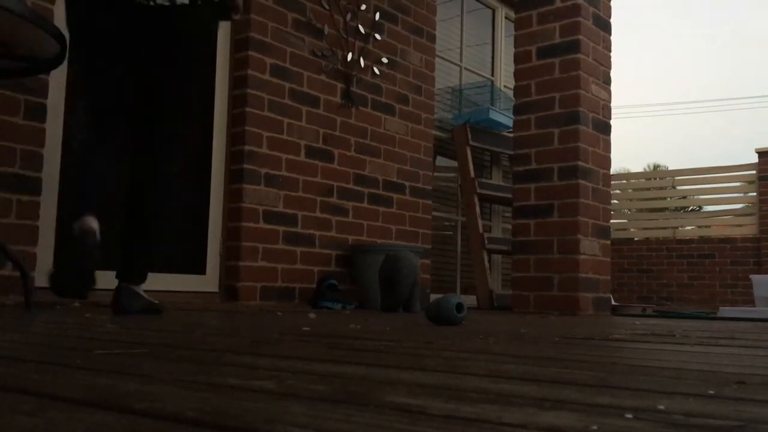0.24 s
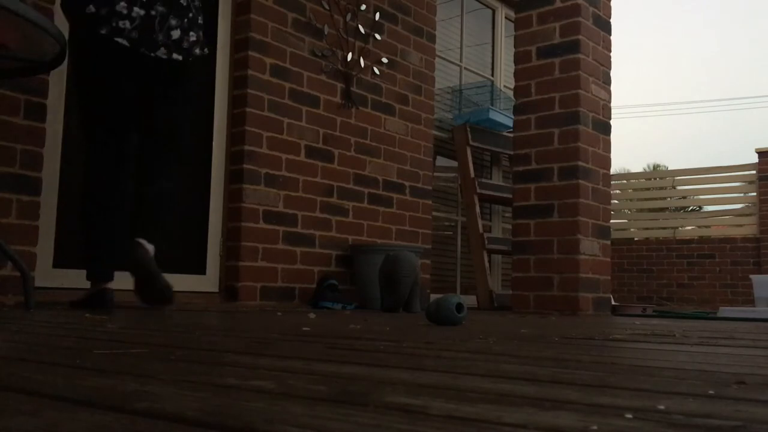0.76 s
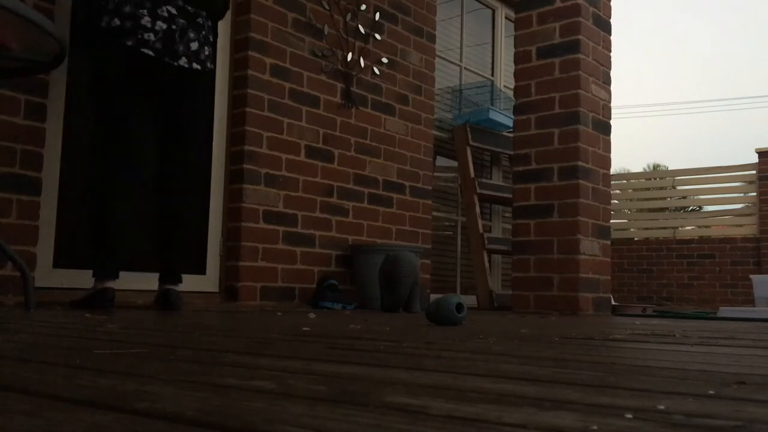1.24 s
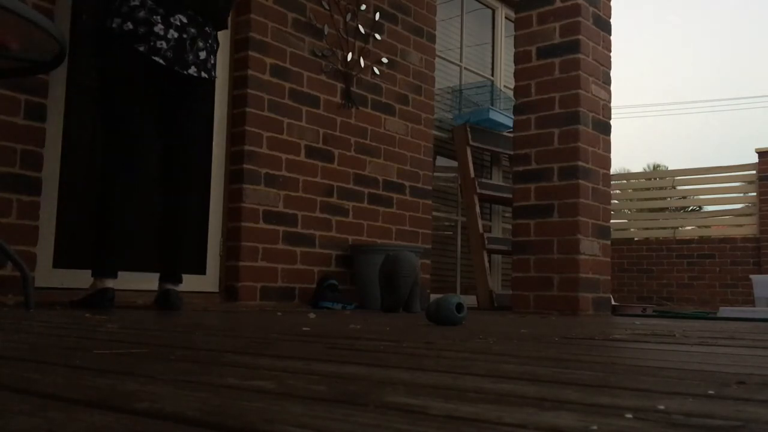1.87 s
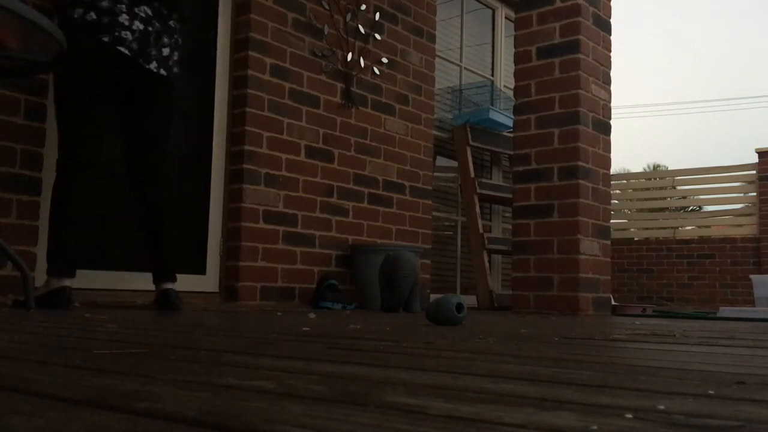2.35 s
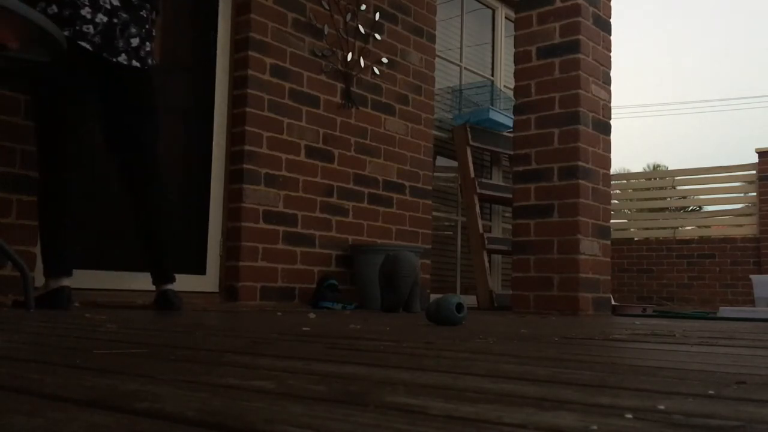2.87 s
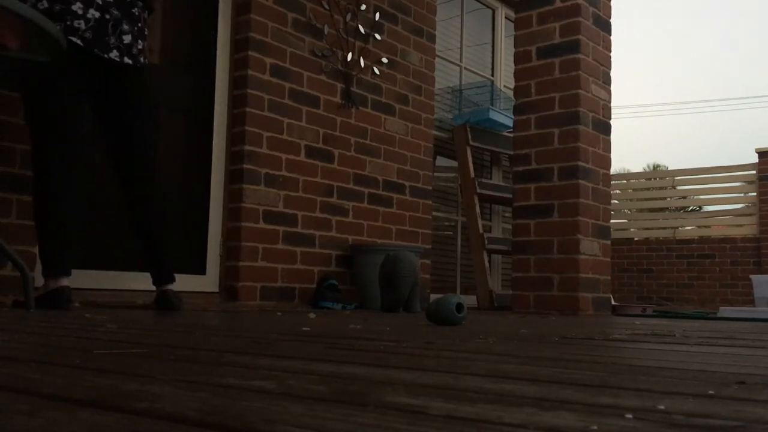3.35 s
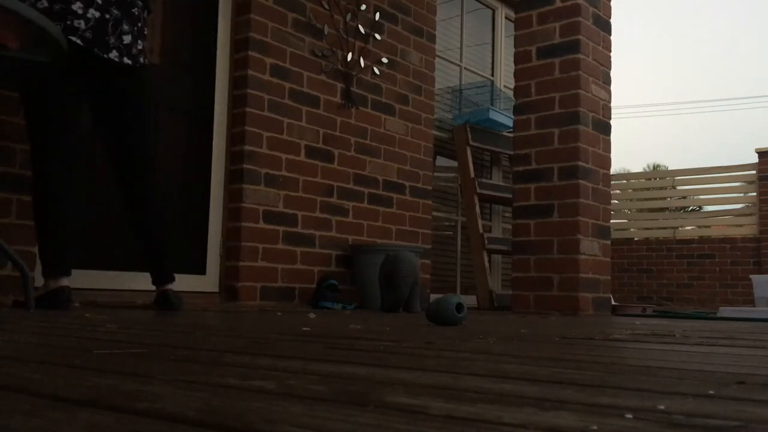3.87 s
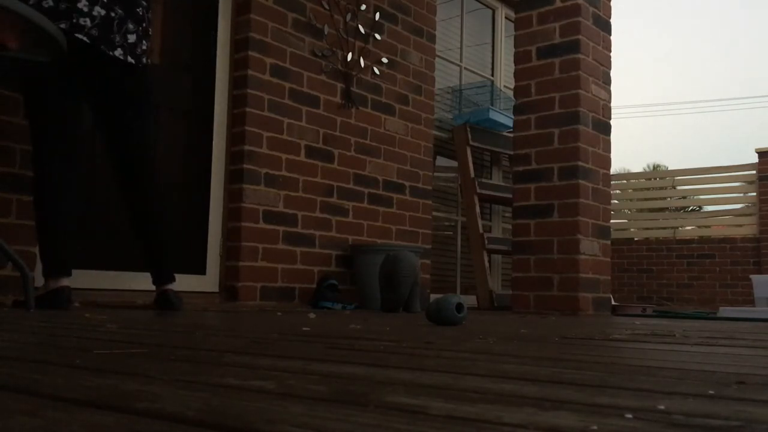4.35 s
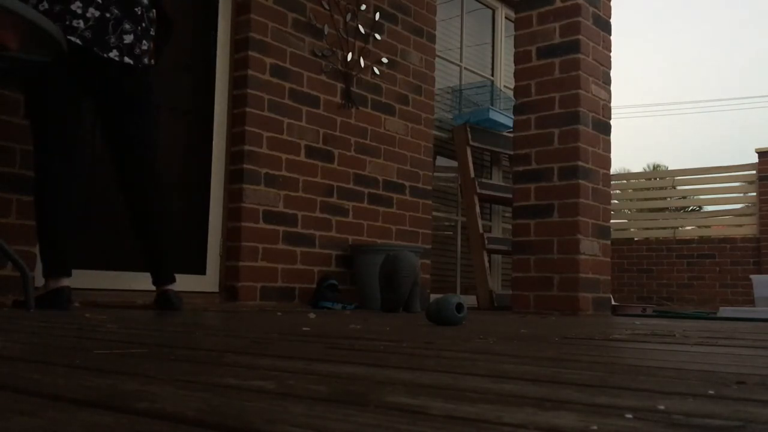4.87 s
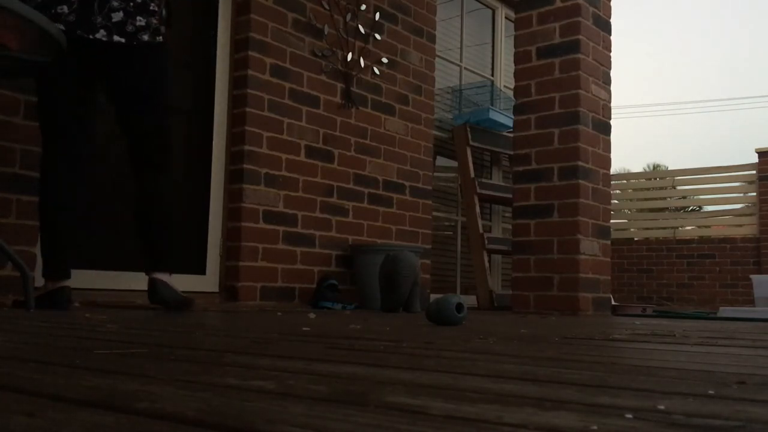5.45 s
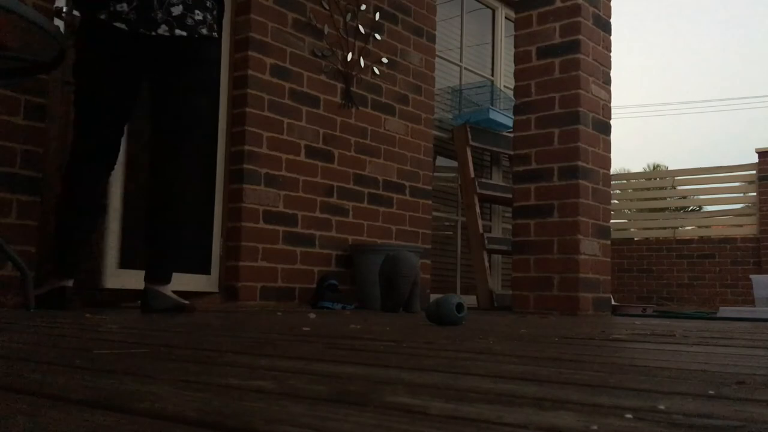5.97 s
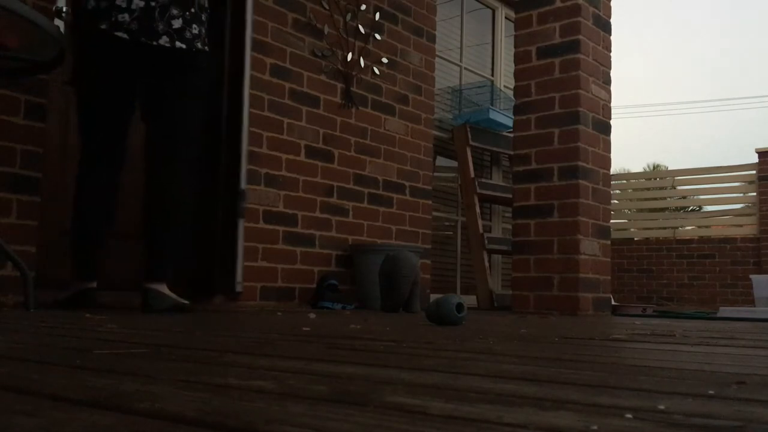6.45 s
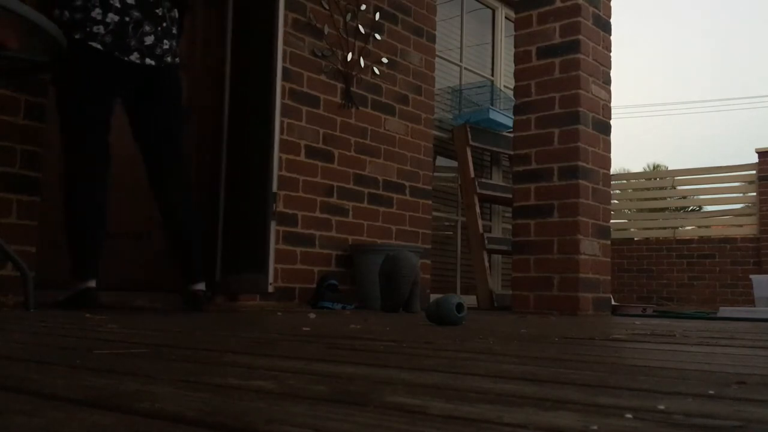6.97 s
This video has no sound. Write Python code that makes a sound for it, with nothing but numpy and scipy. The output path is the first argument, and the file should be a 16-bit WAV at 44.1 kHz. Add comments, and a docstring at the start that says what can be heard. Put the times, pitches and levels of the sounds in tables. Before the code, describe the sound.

Keys jangle on a wooden porch as shoes knock and scuff the boards, a lock clunks open and a door swings free over distant traffic rumble.

```python
"""Keys and door on a wooden porch deck

Someone crosses a wooden deck under a brick porch with a bunch of keys, works the lock and swings the door open.
Keys chink as short rattles that set off damped pings; lock clicks ring the door leaf and the struck part;
shoes knock and scuff on resonant boards; the leaf booms and a hinge squeaks once, both as sine tones.
Behind, shaped noise makes distant traffic, and gliding tones make road hums and an engine that revs, then is gone.
"""
import sys
import numpy as np
from scipy import signal
from scipy.io import wavfile
from scipy.ndimage import uniform_filter1d

SR = 44100
rng = np.random.default_rng(int(sys.argv[2]) if len(sys.argv) > 2 else 0)


def inscribe(sig):
    """Save sig as 16-bit PCM at rate SR to the path in sys.argv[1].

    A 1-D sig is mono; a 2-D sig holds one channel per row.
    Samples are clipped to [-1, 1] before scaling.
    """
    pcm = np.round(np.clip(np.atleast_2d(sig).T, -1, 1) * 32767)
    wavfile.write(sys.argv[1], SR, pcm.astype(np.int16))


N = 318402


def gain_of(db):
    """Amplitude factor of a level in dB."""
    return 10 ** (np.asarray(db) / 20)


def evened(x):
    """Scale to rms 1."""
    return x / np.sqrt(np.mean(x ** 2) + 1e-20)


def read(points, hz):
    """Read a (frequency, value) table, interpolating over log frequency."""
    f, value = np.transpose(points)
    return np.interp(np.log(hz + 1), np.log(f + 1), value)


def curve(rows, column=1):
    """One column over the whole scene; -150 outside the rows, which silences a level in dB."""
    rows = np.array(rows)
    return np.interp(np.arange(N) / SR, rows[:, 0], rows[:, column], left=-150, right=-150)


def add(mix, s, sound):
    """Mix a sound in at a time in seconds, cut off at the end of the mix."""
    part = mix[..., round(s * SR):][..., :sound.shape[-1]]
    part += sound[..., :part.shape[-1]]


def resonate(x, hz, width):
    """A resonance of gain 1 at its peak."""
    return signal.lfilter(*signal.iirpeak(hz, hz / width, SR), x)


def response(points, peaks=(), over_db=0):
    """Causal impulse response of unit energy for a spectrum with resonant peaks standing over it."""
    hz = abs(np.fft.fftfreq(8192, 1 / SR))
    gain = gain_of(np.maximum(read(points, hz), -100))
    resonances = sum(gain_of(over_db + db) / np.hypot(1, 2 * (hz - f) / w) for f, w, db in peaks)
    gain = gain * (1 + resonances)
    minimum_phase = np.exp(np.conj(signal.hilbert(np.log(gain))))
    taps = np.fft.ifft(minimum_phase).real[:4096]
    return taps / np.linalg.norm(taps)


def grit(size, per_s, spread_db):
    """Tiny random impacts of uneven size, rms 1."""
    hits = rng.standard_normal(size) * (rng.random(size) < per_s / SR)
    return evened(hits * gain_of(spread_db * np.minimum(rng.exponential(1, size), 4)))


def rattle(decay_s, rise=0.89):
    """A blow and its rebounds: grit that builds over a share of its decay time and dies away."""
    u = np.arange(5000) / SR / decay_s
    envelope = (1 - np.exp(-u / rise)) * np.exp(-u)
    return grit(len(u), 12000, 2.9) * envelope * 2


def tone(rows, column=2, multiple=1, waver=0.011):
    """A sine on a pitch curve, slightly unsteady; its levels are rms."""
    drift = evened(uniform_filter1d(rng.standard_normal(N), 3000))
    hz = np.maximum(curve(rows), 0) * multiple * (1 + waver * drift)
    phase = 2 * np.pi * np.cumsum(hz) / SR
    return np.sqrt(2) * gain_of(curve(rows, column)) * np.sin(phase)


def keys():
    """Each chink is a tick plus damped pings of the keys struck; shuffling adds a rustle, taps are dry ticks."""
    # keys strike each other: (time [s], level [dB], pitch of the loudest mode [Hz], ring trim [dB])
    chinks = [(0.066, -37, 7040, 3), (0.14, -45, 7400, 7), (0.2277, -27, 7250, 1), (0.308, -47, 8880, -18),
              (0.406, -28, 12600, -11), (0.444, -27.5, 8800, -4), (0.629, -44.5, 9830, 7),
              (0.934, -39.5, 14600, 9), (0.975, -42, 10400, -3), (1.221, -37.5, 14740, 7),
              (1.267, -44, 10500, -12), (1.363, -51, 13970, 18), (1.674, -52, 11900, 13),
              (1.728, -46, 6990, 5), (1.744, -39, 10690, 14), (1.85, -46, 12600, 0),
              (1.867, -38, 15100, 17), (1.916, -33.5, 14550, 8), (2.0822, -50, 6096, 20),
              (2.168, -37.5, 10600, 8), (2.219, -36, 14550, 1), (2.254, -34, 13700, -8),
              (2.276, -33.5, 9050, 4), (2.294, -39, 14200, 16), (2.485, -41, 6974, 6),
              (2.52, -35, 12400, -8), (3.165, -27, 13100, -17), (3.293, -47.5, 8160, 10),
              (4.164, -33, 12400, -9), (5.024, -44, 15300, 2), (5.282, -49, 12600, 14),
              (5.379, -48, 6990, -3), (5.422, -43, 14200, 14), (5.456, -40, 11900, 9),
              (5.471, -33, 14820, 23.5), (5.483, -41, 9500, 12), (5.568, -30, 14400, -9),
              (5.781, -36.5, 12300, -10), (6.2967, -42, 9530, 3), (6.381, -34, 14100, -2),
              (6.407, -38, 9050, 10), (6.433, -33, 11900, 14), (6.535, -28, 11600, 8),
              (6.584, -44, 9500, 0), (6.762, -49, 14550, 4), (6.789, -47, 9600, 19),
              (6.872, -40, 12400, -17), (6.902, -36, 10000, -17), (6.997, -36, 12450, -3),
              (7.025, -35, 14920, 0), (7.043, -42, 10100, 8), (7.112, -33, 9200, 6.5),
              (7.182, -29.5, 9850, -2)]
    # modes of the bunch: (frequency [Hz], relative level [dB], t60 before hand damping [s], key index)
    modes = [(5356, -13, .13, 0), (7359, -12, .1, 0), (9502, -3, .08, 0), (11880, -5, .07, 0),
             (14550, -4, .08, 0), (8274, -6, .07, 1), (10400, -3, .06, 1), (15240, -2, .08, 1),
             (6988, -5, .11, 2), (12610, -3, .1, 2), (13700, -7, .08, 2), (6100, -9, .07, 3),
             (9055, -5, .07, 3), (11010, -8, .06, 3), (14190, -3, .07, 0), (15670, -4, .05, 3)]
    # keys shuffle in the hand: (time [s], level [dB])
    shuffling = [(0.0, -61), (0.3, -50), (0.5, -65), (1.65, -79), (1.85, -66), (2.43, -64), (2.65, -76.5),
                 (3.58, -81), (4.1, -77), (5.25, -67), (5.61, -69.5), (7.22, -65.5)]
    # color of key on key: (frequency [Hz], relative level [dB per Hz])
    tick_color = [(1500, 0.5), (4000, 2), (6500, 4.5), (10000, 4.5), (14000, 5), (16000, 5.5)]
    # single dry ticks of a key against metal: (time [s], peak level [dB], pitch [Hz])
    taps = [(2.201, -37, 4100), (2.256, -39, 5740), (4.147, -46, 12800), (4.178, -29, 12600),
            (4.2, -44, 12800), (4.237, -47, 12800), (4.245, -54, 12500), (4.481, -48, 12500)]
    chink_decay_s = 0.0087
    far_db_per_octave = -4  # modes far from the struck one are barely stirred
    tap_width = .25  # share of the pitch

    hz, mode_db, t60, key = np.transpose(modes)
    smooth = uniform_filter1d(rng.standard_normal(N), size=900)
    bursts = evened(uniform_filter1d(smooth, size=900))
    shuffle = gain_of(curve(shuffling) + 4.4 * bursts)  # the bunch shifts in fits and starts
    ticks = shuffle * grit(N, 5000, 0.46)
    blows, dry = np.zeros((len(hz), N)), np.zeros(N)

    for s, db, pitch, ring_db in chinks:
        blow = gain_of(db - 11.0) * rattle(chink_decay_s, rise=0.78)
        # the contact is brightest near the struck mode
        add(ticks, s, 0.87 * blow + 0.7 * resonate(blow, pitch, 1640.0))

        # modes of the struck key answer more than those of its neighbors
        loudest = np.argmin(abs(hz - pitch))
        touch_db = np.where(key == key[loudest], -6., -18.) + 4.0 * rng.standard_normal(len(hz))
        touch_db += far_db_per_octave * abs(np.log2(hz / pitch))
        touch_db[loudest] = 0

        # keys meet one after another, then rebound
        late = rng.uniform(0, 2.5 * chink_decay_s, (len(hz), 3))
        gains = gain_of(db + ring_db + touch_db)
        for track, gain, (first, rebound, again) in zip(blows, gains, late):
            add(track, s + 0.31 * first, np.array([gain]))
            add(track, s + first + rebound, np.array([0.5 * gain]))
            add(track, s + first + 2 * rebound + again, np.array([-0.3 * gain]))

    for s, db, pitch in taps:
        width = tap_width * pitch
        tap = resonate(resonate(signal.unit_impulse(400), pitch, width), pitch, width)
        add(dry, s, gain_of(db) * tap / abs(tap).max())

    rings = np.zeros(N)
    widths = 1.4 * np.log(1000) / np.pi / t60  # in Hz; the hand damps the modes
    for blow, f, db, width in zip(blows, hz, mode_db, widths):
        impulse_gain = SR / (2 * np.pi * width)  # wide and narrow modes start equally loud
        rings += gain_of(db - 18.5) * resonate(blow, f, width) * impulse_gain
    return signal.oaconvolve(ticks, response(tick_color))[:N] + rings + dry


def lock():
    """Blows ring the lock, the door leaf and the part struck; how hard the contact is sets the treble."""
    # lock, latch and door: (time [s], level [dB], treble against body [dB], part pitch [Hz], rattle decay [s])
    clicks = [(2.9, -39.5, -23, 1435, 0.0052), (3.004, -41.5, -10, 3380, 0.0055),
              (3.163, -39, -20, 950, 0.0069), (3.204, -27.5, -41, 1270, 0.0038),
              (3.606, -27.5, -15, 1290, 0.0055), (3.77, -31, -16.5, 1310, 0.0045),
              (3.808, -46, -25, 1480, 0.0031), (3.898, -31, -15.5, 1240, 0.0061),
              (3.948, -34, -16.5, 930, 0.0075), (4.071, -35.5, -6, 2660, 0.017),
              (4.133, -40, 2.5, 1640, 0.013), (4.17, -34.5, -9, 1170, 0.012),
              (4.188, -28.5, -6, 2420, 0.014), (4.234, -36.5, 1.5, 2640, 0.004),
              (4.292, -44, 6.5, 2830, 0.0053), (4.346, -49.5, 6.5, 2100, 0.014),
              (4.451, -38, -6, 1290, 0.0064), (4.48, -41.5, 1, 1110, 0.0072), (4.52, -31.5, 6, 2700, 0.011),
              (4.564, -44, -23, 1260, 0.03), (4.602, -20.5, -11, 1360, 0.0042),
              (4.606, -14.5, -0.5, 2800, 0.0058), (4.614, -22, 6.5, 1330, 0.0029),
              (4.635, -31, -9, 2800, .004), (4.642, -33, 0.5, 1170, 0.0083), (4.815, -54, 7, 2740, 0.0032),
              (4.846, -25, 11, 2690, 0.0026), (4.936, -40.5, 3, 950, 0.0077), (4.977, -35, 3, 1970, 0.004),
              (5.168, -39, -22, 1070, 0.013), (5.196, -30.5, -8, 1290, 0.0067),
              (5.217, -50, 13, 1340, 0.006), (5.531, -34, -12.5, 1030, 0.0085),
              (5.563, -36, 3, 1510, 0.015), (5.592, -25.5, -1, 1080, 0.0094), (5.626, -37, 2, 2780, 0.0094),
              (5.694, -25.5, -4.5, 1130, 0.0052), (5.722, -31.5, 8.5, 1290, 0.0033),
              (5.803, -48, 0, 2060, 0.022), (5.85, -48, 4.5, 2800, 0.013), (6, -37.5, 6, 2700, 0.0084),
              (6.113, -27.5, 7.5, 1520, 0.0085), (6.119, -28, 9.5, 3480, 0.0088),
              (6.153, -31.5, -11, 2980, 0.011), (6.168, -26, 1.5, 2950, 0.0059),
              (6.194, -39.5, -5, 3130, 0.013), (6.478, -47, 10.5, 2360, 0.0061),
              (6.485, -47.5, 6.5, 4870, 0.013), (6.586, -46, 7, 3470, 0.014)]
    # resonances of lock and leaf: (frequency [Hz], width [Hz], level over the broad knock [dB])
    leaf_rings = [(1150, 110, 4), (1570, 120, 4), (2870, 190, 8), (3500, 250, 4), (5400, 300, 4),
                  (8700, 900, 15), (12700, 1300, 14)]
    # broad color of the knock: (frequency [Hz], relative level [dB per Hz])
    knock_color = [(150, -52), (250, 4.5), (528, 3.5), (1180, 9), (2130, 3), (2860, 2), (4900, -19),
                   (5440, -21), (9830, -29), (16000, -32.5)]
    # the key grinds in the barrel and the door shifts in its frame, a list each: (time [s], level [dB])
    grinds = [
        [(3.9, -90), (4.294, -46.5), (4.58, -45), (5.1, -79)],
        [(5.5, -54), (5.692, -72), (6.0, -55)],
    ]
    # ring of the struck part by its pitch: (pitch [Hz], ring over the blow [dB])
    part_ring = [(1000, 6.5), (1450, 11), (2050, 21), (2750, -38), (3300, -10), (4000, 9)]
    mid_share = 0.39  # share of a soft blow's treble loss in dB that the middle band loses too

    body, treble, parts = np.zeros((3, N))
    soft = np.zeros(N)  # what soft blows lack above about 1.9 kHz
    for rows in grinds:
        body += gain_of(curve(rows) - 7.0) * grit(N, 1500, 5.2)
    for s, db, treble_db, pitch, decay_s in clicks:
        blow = gain_of(db - 6.0) * rattle(decay_s)
        add(body, s, blow)
        add(soft, s, (1 - gain_of(mid_share * min(treble_db, 0))) * blow)
        add(treble, s, gain_of(treble_db) * blow)
        part = resonate(resonate(blow, pitch, .16 * pitch), pitch, pitch)
        add(parts, s, gain_of(read(part_ring, pitch)) * part)

    lacking = signal.sosfiltfilt(signal.butter(2, 1900, "high", fs=SR, output="sos"), soft)
    body = body - lacking
    ring = response(knock_color, leaf_rings)
    out = parts
    for blows, band in ((body, "low"), (treble, "high")):
        split = signal.butter(4, 5000, band, fs=SR, output="sos")
        band_ring = signal.sosfilt(split, ring)
        out = out + signal.oaconvolve(blows, band_ring / np.linalg.norm(band_ring))[:N]
    return out


def steps():
    """A footfall pushes the boards, most of all those near its pitch; a hard heel adds a bright tap."""
    # heels and soles land: (time [s], level [dB], pitch [Hz])
    footfalls = [(0.116, -30.5, 467), (0.133, -37.5, 296), (0.54, -35.5, 950), (0.558, -39, 600),
                 (0.667, -38, 231), (0.787, -41.5, 456), (1.041, -36, 830), (1.057, -39, 530),
                 (1.07, -40, 230), (2.199, -38.5, 910), (2.24, -41.5, 1240), (2.259, -43, 260),
                 (4.196, -34.5, 680), (4.299, -45, 273), (5.582, -38.5, 970), (6.157, -40, 846)]
    # resonances of the deck: (frequency [Hz], width [Hz], relative level [dB])
    board_modes = [(151, 130, -7), (254, 67, 22), (443, 130, 29), (635, 210, 21), (970, 77, 29),
                   (1300, 130, 28)]
    footfall_decay_s, heel_db = 0.0046, -6
    land_s = 0.00513  # the weight lands this long after the sole touches
    struck_width_hz, boards_share = 125, .7  # ring of the struck board, part of the other boards

    out = np.zeros(N)
    for s, db, pitch in footfalls:
        blow = rattle(footfall_decay_s, rise=0.26)
        t = np.arange(len(blow)) / SR
        # part of the weight lands in one stroke
        push = blow + 1.3 * np.exp(-(4 * pitch * (t - land_s)) ** 2)
        boards = np.zeros(len(blow))
        for f, width, mode_db in board_modes:
            stirred_db = mode_db - 2.2 * np.log(f / pitch) ** 2
            boards += gain_of(stirred_db) * resonate(push, f, width)
        struck = evened(resonate(push, pitch, struck_width_hz))
        # soft soles give little treble
        knock = resonate(boards_share * evened(boards) + struck, pitch, 2.5 * pitch)
        heel = gain_of(heel_db) * resonate(blow, 1200.0, 1670.0)
        add(out, s, gain_of(db + 6.0) * (knock / abs(knock).max() + heel))
    return out


def scuffs():
    """Stick and slip of the sole: dense grit in uneven clumps, part of it ringing at the pitch of the rasp."""
    # soles drag over the grain: (time [s], level [dB], rise [s], fade [s], rasp pitch [Hz], ringing share [0-1])
    drags = [(.024, -34, 0.0085, 0.057, 2800, 0.54), (.08, -40, 0.031, 0.015, 2820, 0.5),
             (0.137, -38.5, .01, .025, 2750, .8), (0.166, -38.5, .01, 0.022, 2300, 0.55),
             (0.194, -32.5, 0.0073, .01, 2840, 0.8), (.213, -33, 0.0062, 0.024, 2730, 0.7),
             (.25, -42.5, 0.022, 0.055, 2860, 0.7), (.302, -35.5, 0.012, 0.021, 2150, 0.67),
             (0.402, -42, 0.0039, 0.028, 2390, 0.32), (1.019, -49, 0.0065, 0.019, 2140, 0.54),
             (1.94, -45, 0.049, 0.019, 2940, 0), (2.483, -53.5, 0.0099, 0.034, 1990, 1),
             (7.02, -44.5, 0.012, 0.019, 2110, 0.5), (7.05, -51.5, 0.022, 0.054, 1500, 0.34),
             (7.104, -57.5, 0.0083, 0.025, 2260, 0.9)]
    # broad color of the rasp: (frequency [Hz], relative level [dB per Hz])
    rasp_color = [(300, -9.5), (700, -6.5), (1800, -2.5), (2700, -3.5), (4800, -8), (9000, -16),
                  (16000, -22)]
    # resonances of the rasp: (share of the rasp pitch, width [Hz], level before the common lift [dB])
    rasp_rings = [(.8, 247, -19), (1, 340, 8)]
    drag_fade_db = -12  # fall of the force over each fade time

    out = np.zeros(N)
    plain = response(rasp_color)
    for s, db, rise, fade, pitch, ring in drags:
        clumps = evened(uniform_filter1d(rng.standard_normal(16000), 300))
        grains = grit(16000, 5000, 0.33) * gain_of(2.8 * clumps)
        t = np.arange(len(grains)) / SR
        falling = gain_of(db + drag_fade_db * np.maximum(t - rise, 0) / fade)
        force = np.minimum(t / rise, 1) ** 2 * falling
        peaks = [(share * pitch, width, peak_db) for share, width, peak_db in rasp_rings]
        rasp = response(rasp_color, peaks, over_db=16)
        add(out, s, signal.oaconvolve(force * evened(grains), ring * rasp + (1 - ring) * plain))
    return out


def door():
    """The leaf booms as a sine under a smooth swell; the hinge squeaks as a sine whose pitch arches up and down."""
    # the leaf comes free: (time [s], peak level [dB], frequency [Hz], length [s])
    boom = (5.562, -32, 66, .105)
    squeak_s, squeak_length_s, squeak_edge_s = 5.906, .142, .006
    squeak_hz, squeak_arch_hz = 12000, 630  # pitch at the ends, rise in between
    squeak_db, squeak_swell_db = -46.5, -0.5  # rms level at the start, change by the end

    u = np.linspace(0, 1, 30)
    edge = np.clip(np.minimum(u, 1 - u) * squeak_length_s / squeak_edge_s, .05, 1)
    times = squeak_s + squeak_length_s * u
    pitches = squeak_hz + squeak_arch_hz * np.sqrt(np.sin(np.pi * u ** 1.25))
    levels = squeak_db + squeak_swell_db * u + 20 * np.log10(edge)
    out = tone(np.transpose([times, pitches, levels]), waver=0.00072)

    s, db, hz, length = boom
    t = np.arange(0, length, 1 / SR)
    swell = np.sin(np.pi * t / length) ** 2
    add(out, s, gain_of(db) * swell * np.sin(2 * np.pi * hz * t))
    return out


def porch(x):
    """Brick walls and ceiling: sparse echoes of random sign, each band dying away at its own speed."""
    # decay of the porch: (frequency [Hz], t60 [s])
    decay = [(200, 0.28), (1000, 0.3), (3000, 0.22), (8000, 0.16), (16000, 0.087)]
    shift_s = .05  # period of the hand-over between two echo patterns, which varies the echo from blow to blow

    out, turn = np.zeros(N), 2 * np.pi * np.arange(N) / SR / shift_s
    for share in (np.cos(turn), np.sin(turn)):
        echoes = np.zeros(SR // 2)
        at = np.arange(180, len(echoes) - 10, 10)
        echoes[at + rng.integers(0, 10, len(at))] = rng.choice([-1., 1.], len(at))
        hz, t, z = signal.stft(echoes, SR, nperseg=256)
        fall = gain_of(-60 * t / read(decay, hz)[:, None])
        tail = signal.istft(z * fall, SR, nperseg=256)[1]
        out += signal.oaconvolve(share * x, tail / np.linalg.norm(tail))[:N]
    return out


def traffic():
    """Patchy noise whose rumble and tyre roar swell separately, with engine tones and road hums on top."""
    # engine: (time [s], firing pitch [Hz], level [dB], level at 1.5 times [dB], level at 2.5 times [dB])
    engine_rows = [(0.0, 56.07, -52, -54, -59.5), (0.43, 59.38, -37.5, -50, -52),
                   (1.03, 47.2, -52.5, -57, -62), (1.52, 60.45, -38.5, -54, -53.5),
                   (2.09, 64.85, -40.5, -45.5, -59), (2.43, 56.7, -38.5, -44.5, -48.5),
                   (2.85, 56.4, -50, -85, -48), (3.3, 57, -50, -77, -93)]
    # steadier hums from the road, a list each: (time [s], pitch [Hz], rms level [dB])
    hums = [
        [(3.1, 89.8, -52.5), (5.11, 89.2, -48.5), (5.6, 84.8, -81)],
        [(3.9, 47.0, -49), (5.0, 53.3, -49), (7.22, 46.6, -58.5)],
        [(5.9, 116.4, -59), (6.91, 116.5, -52.5), (7.22, 125.9, -57.5)],
    ]
    # color of the traffic noise: (frequency [Hz], relative level [dB per Hz])
    noise_color = [(12, -67), (20, -14), (36, -26), (65, 5.5), (98, -5), (113, -2.5), (150, -8.5),
                   (270, -25.5), (328, -29), (607, -34), (698, -34), (873, -31.5), (1220, -30.5),
                   (2020, -41), (16000, -76)]
    # swells of the road: (time [s], rumble level [dB], tyre roar level [dB])
    road = [(0.0, -53, -56), (0.4, -45.5, -55.5), (3.58, -47, -58), (4.38, -45.5, -54.5), (5.25, -47, -58),
            (7.22, -50.5, -57.5)]

    frames, hz = N // 512 + 6, np.fft.rfftfreq(2048, 1 / SR)
    real, imaginary, patches = rng.standard_normal((frames, 1025, 3)).T
    # smooth the patches over frequency, then over time
    patches = evened(uniform_filter1d(uniform_filter1d(patches, 14, 0), 8, 1))
    z = (real + 1j * imaginary) * gain_of(read(noise_color, hz)[:, None] + 0.71 * patches)

    low = 1 / (1 + (hz / 386.0) ** 4)[:, None]  # power share of the rumble
    bands = []
    for part in (low, 1 - low):
        band = signal.istft(z * np.sqrt(part), nperseg=2048, noverlap=1536)[1][:N]
        bands.append(evened(band))
    rumble, roar = bands
    noise = gain_of(curve(road) - 0.5) * rumble + gain_of(curve(road, column=2) + 0.5) * roar

    engine = tone(engine_rows)
    engine += tone(engine_rows, column=3, multiple=3 / 2)
    engine += tone(engine_rows, column=4, multiple=5 / 2)
    return noise + engine + sum(tone(rows, waver=0.0073) for rows in hums)


def scene():
    """Keys, door and feet, their echo in the porch, and the traffic beyond."""
    near, feet = keys() + lock() + scuffs() + door(), steps()
    # knocks travel through the deck and stir the porch less
    echo = porch(near + .7 * feet)
    return (near + feet + gain_of(-2.5) * echo + traffic())[None]


def record(dry):
    """The microphone loses the deepest bass; then the band limit of the recorder cuts the top treble."""
    edge_hz = 15930
    thinned = signal.sosfilt(signal.butter(2, 36., "high", fs=SR, output="sos"), dry)
    band_limit = signal.firwin(511, edge_hz, window=("kaiser", 9), fs=SR)
    return signal.oaconvolve(thinned, band_limit[None], "same")


dry = scene()
out = record(dry)
inscribe(out)
```